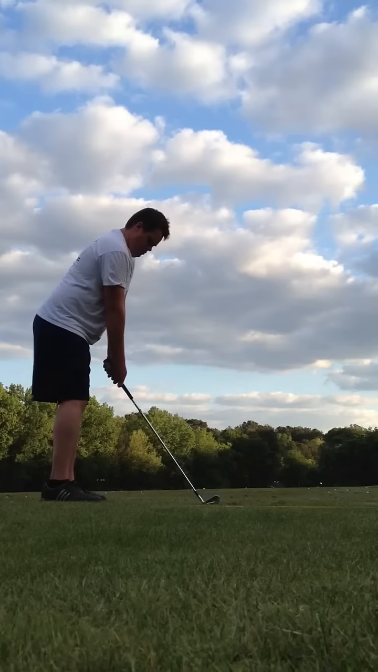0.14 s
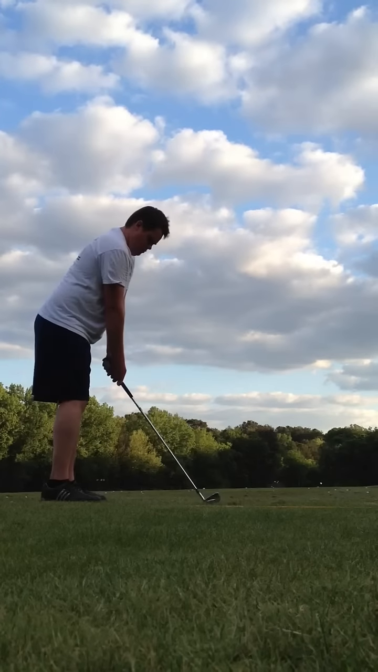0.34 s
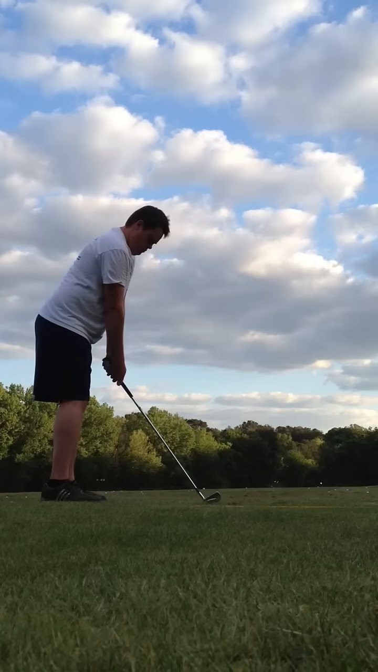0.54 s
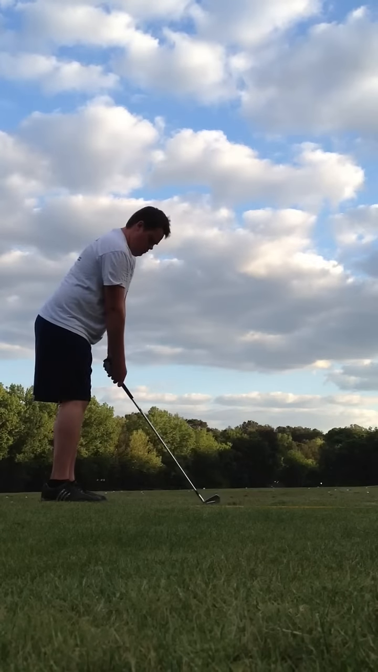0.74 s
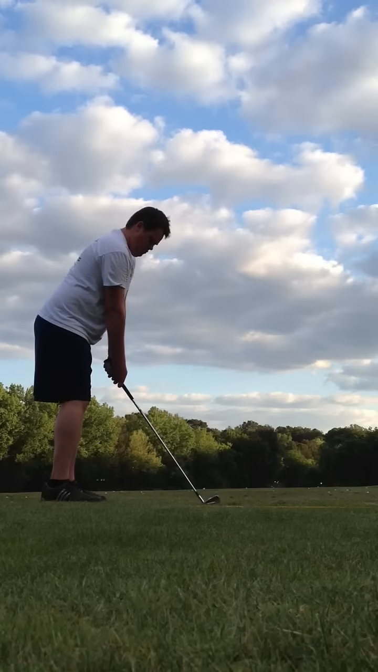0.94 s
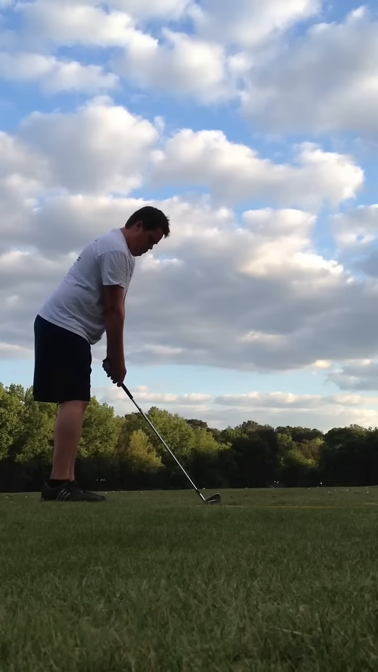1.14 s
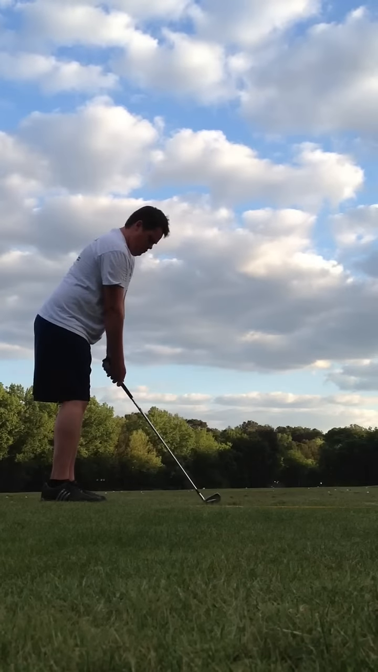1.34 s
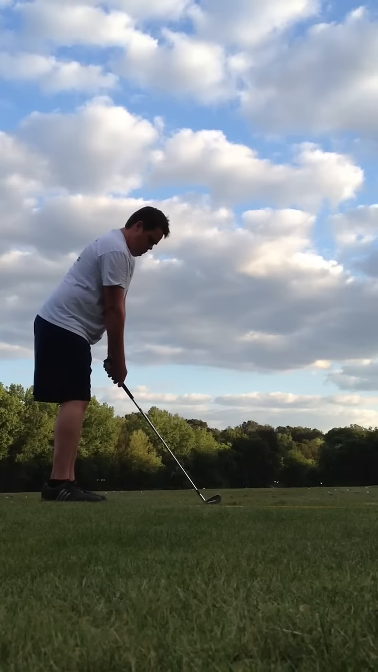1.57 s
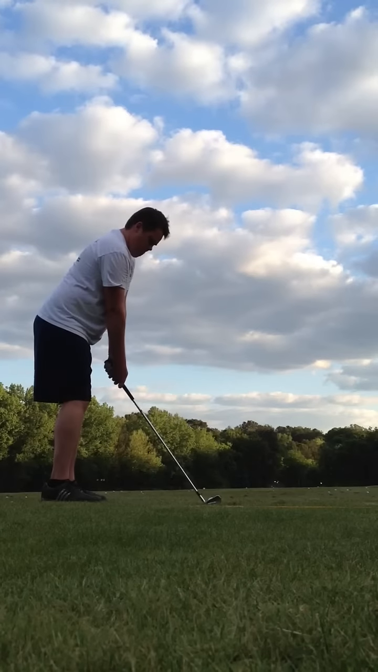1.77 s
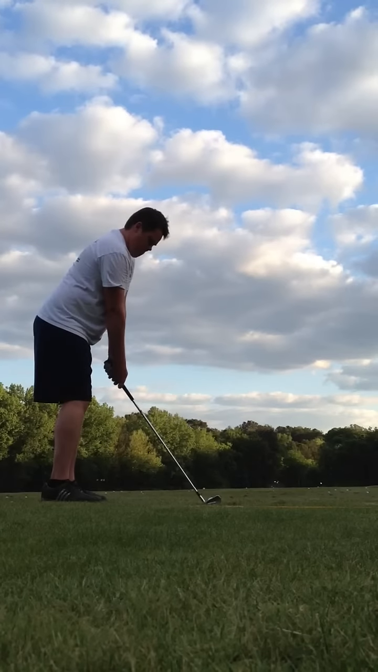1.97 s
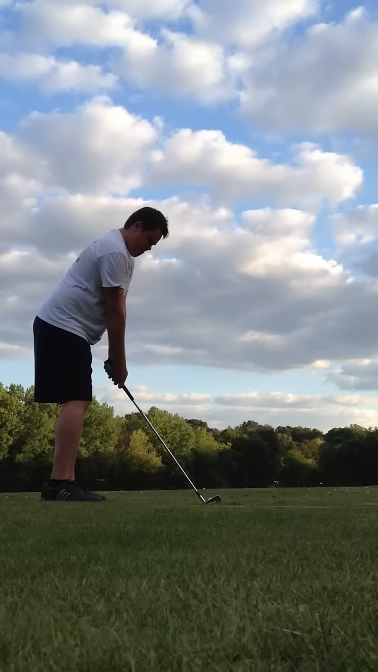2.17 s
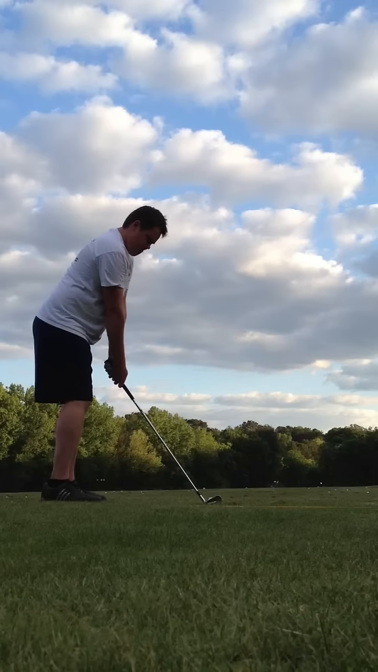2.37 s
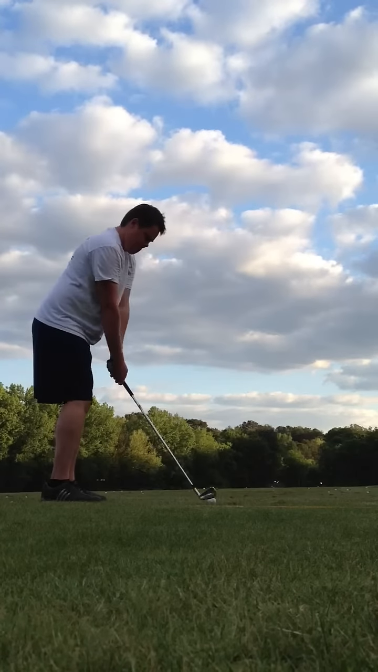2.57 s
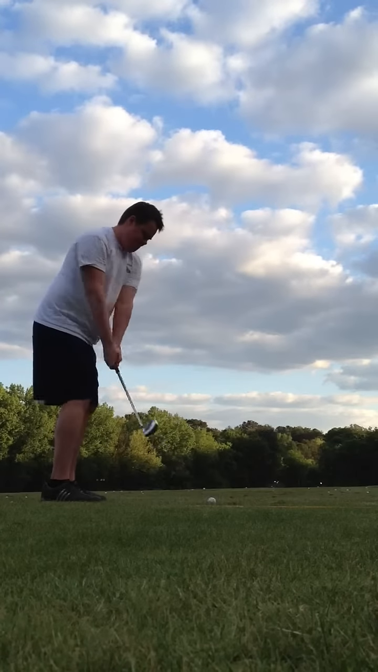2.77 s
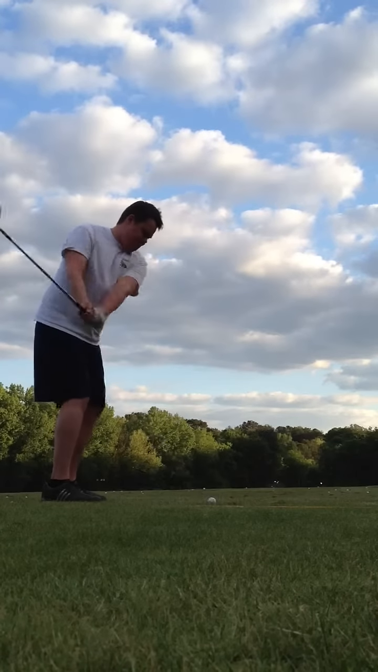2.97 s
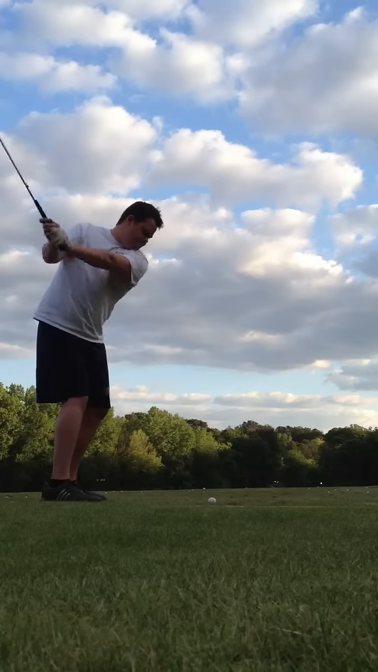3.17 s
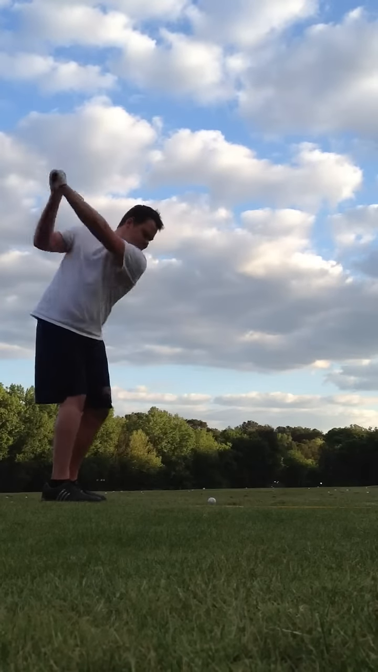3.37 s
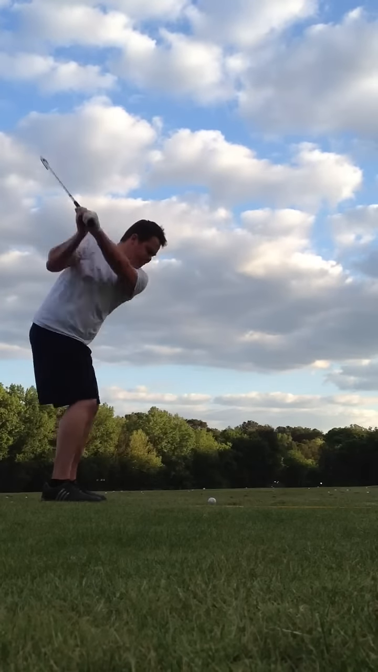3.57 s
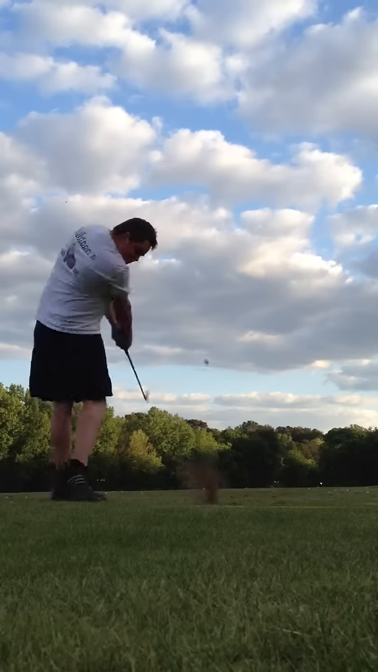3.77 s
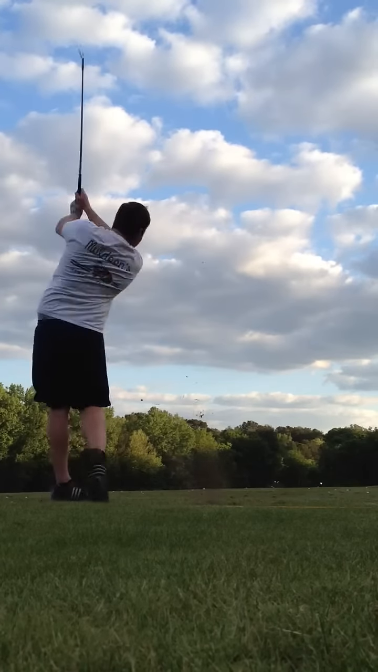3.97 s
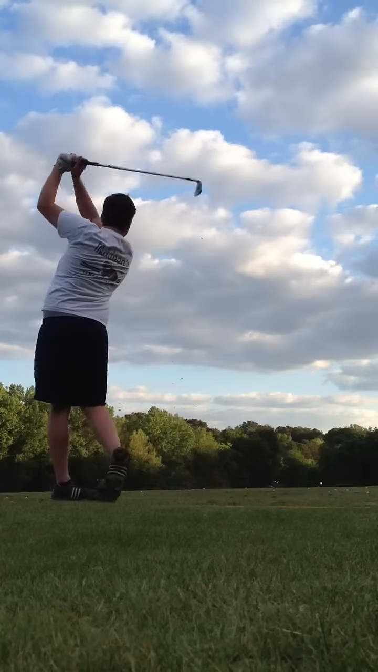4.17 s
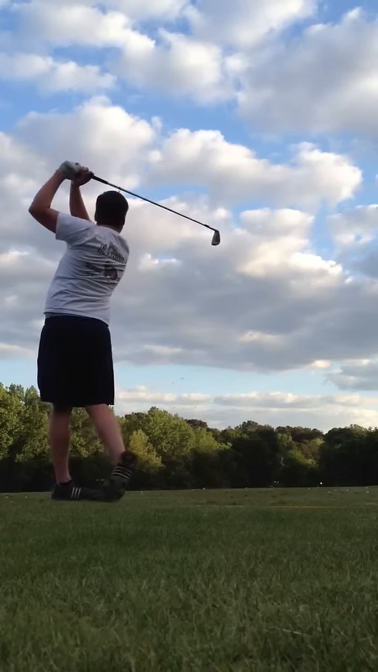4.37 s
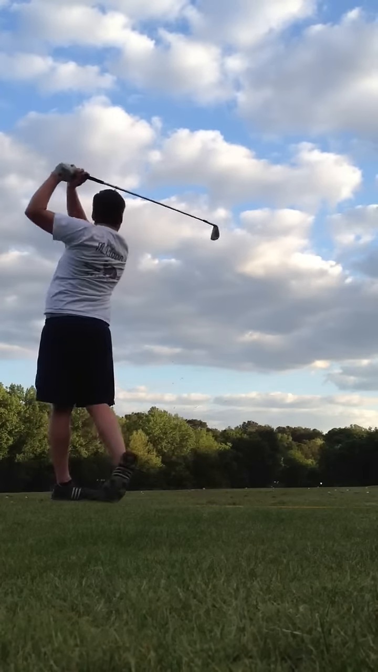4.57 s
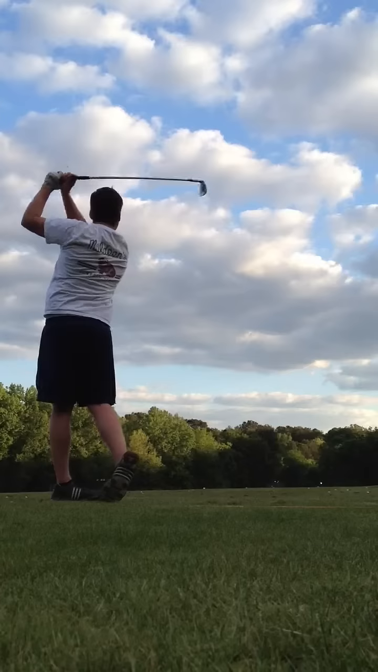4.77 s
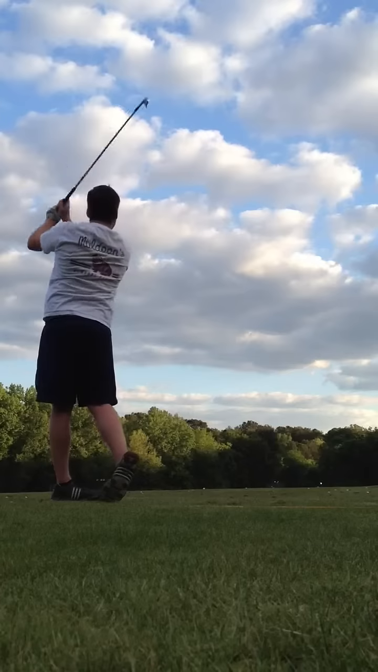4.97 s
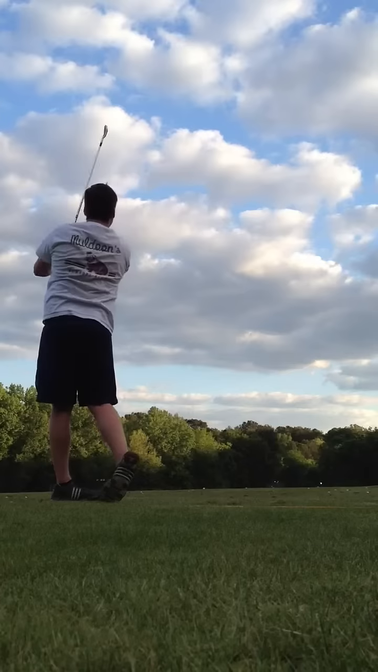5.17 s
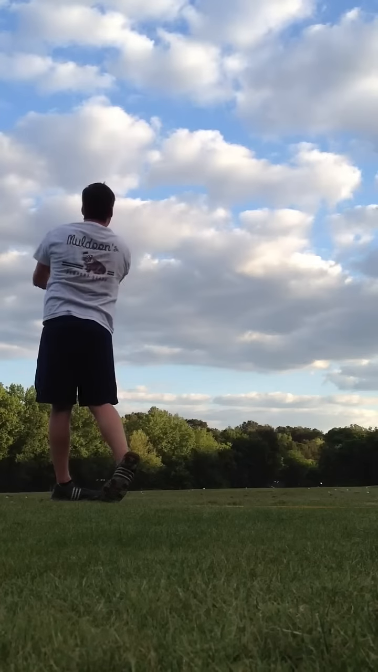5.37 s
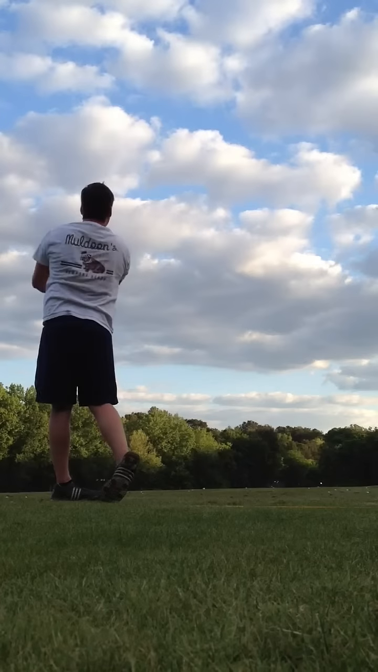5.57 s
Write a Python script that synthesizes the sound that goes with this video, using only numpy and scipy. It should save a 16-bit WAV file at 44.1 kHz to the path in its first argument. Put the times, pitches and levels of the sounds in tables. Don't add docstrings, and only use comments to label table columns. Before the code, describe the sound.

On an open grassy range, thrush-like birds whistle and chip over a low traffic and engine hum. Small grass ticks come close by; a distant golfer's hit cracks faintly before two seconds. Near four seconds an iron swishes and strikes the ball with one loud, dry click and thud, then soil rains lightly on grass. Birds continue. A phone microphone sits low in the grass.

```python
import sys
import numpy as np
from scipy import signal
from scipy.io import wavfile
from scipy.ndimage import uniform_filter1d

SR = 44100
rng = np.random.default_rng(int(sys.argv[2]) if len(sys.argv) > 2 else 0)


def put_to_file(sound):
    columns = np.atleast_2d(sound).T
    safe = np.clip(columns, -1, 1)
    whole_steps = np.round(safe * 32767)
    wavfile.write(sys.argv[1], SR, whole_steps.astype(np.int16))


def boost_factor(decibels):
    exponent = np.asarray(decibels, float) / 20
    return 10 ** exponent


N = 247401


def evened(x):
    return x / np.sqrt(np.mean(x ** 2) + 1e-20)


def add(mix, start_s, sound):
    part = mix[round(start_s * SR):][:len(sound)]
    part += sound[:len(part)]


def unroll(rows):
    s, *columns = np.transpose(rows)
    t = np.arange(s[0], s[-1], 1 / SR)
    return t, [np.interp(t, s, c) for c in columns]


def band(x, low_hz, high_hz):
    edges_hz = np.clip([low_hz, max(high_hz, 1.1 * low_hz)], 30, SR / 2 - 500)
    return signal.sosfilt(signal.butter(2, edges_hz, "bandpass", fs=SR, output="sos"), x)


def resonate(x, hz, width_hz):
    turn = np.exp(2j * np.pi * np.cumsum(hz * np.ones(len(x))) / SR)
    r = np.exp(-np.pi * width_hz / SR)
    return 2 * (turn * signal.lfilter([1 - r], [1, -r], x / turn)).real


def burst(rise_s, t60_s):
    t = np.arange(round((rise_s + t60_s) * SR)) / SR
    return np.minimum(t / rise_s, 1) * boost_factor(-60 * np.maximum(t - rise_s, 0) / t60_s)


# start_s, signed_peak, width_s
BLOWS = [(3.7789, -.15, .00008), (3.77933, .13, .00006), (3.78047, -.21, .0001), (3.7813, -.07, .00008)]
# start_s, pitch_hz, level_db, t60_s, sign
THUD = [
    (3.7769, 700, -29, .012, -1),
    (3.779, 350, -20.5, .022, 1),
    (3.7791, 210, -30, .04, 1),
    (3.78037, 2400, -19, .005, -1),
    (3.7864, 270, -29, .035, -1),
]
# pitch_hz, level_db, t60_s
STRIKE_TONES = [(1105, 3.5, 0.018), (2130, -4, 0.019), (2550, 0.5, 0.016), (3200, -2.5, 0.017),
                (3870, -3.5, 0.014), (4570, -3, 0.01), (4730, -6, .01)]


def strike():
    out, t = np.zeros(N), np.arange(6000) / SR
    for s, peak, width_s in BLOWS:
        add(out, s - .001, peak * np.exp(-.5 * ((t[:100] - .001) / width_s) ** 2))
    for s, hz, db, t60_s, sign in THUD:
        add(out, s, np.sign(sign) * boost_factor(db - 60 * t / t60_s) * np.sin(2 * np.pi * hz * t))
    for hz, db, t60_s in STRIKE_TONES:
        add(out, BLOWS[1][0], boost_factor(-25.5 + db - 60 * t / t60_s) * np.sin(2 * np.pi * hz * t))
    return out


# low_hz, high_hz, level_db, t60_s
CRACK = [
    (3600, 5000, -32.5, 0.024),
    (6000, 8800, -26.5, 0.025),
    (11800, 16400, -38, .014),
]
# start_s, level_db, centre_hz
CLODS = [(3.787, -41, 7200), (3.7898, -49, 6600), (3.799, -47, 4900), (3.8054, -43.5, 4800),
         (3.875, -62, 3900), (3.905, -61, 4500), (3.946, -62, 4600), (3.969, -59, 3900)]
# start_s, level_db, rise_s, t60_s, centre_hz
SHOWERS = [
    (3.79, -60, 0.012, 1.0, 4250),
    (3.812, -63, 0.0088, 0.21, 4600),
    (3.901, -66, 0.065, 0.79, 4530),
]


def spray():
    contact_s, clod_spread, shower_spread = 3.7785, 1.33, 1.75
    crack = [(contact_s, db, .001, t60_s, low_hz, high_hz) for low_hz, high_hz, db, t60_s in CRACK]
    clods = [(s, db, .0015, 0.016, hz / clod_spread, hz * clod_spread) for s, db, hz in CLODS]
    showers = [(*row, hz / shower_spread, hz * shower_spread) for *row, hz in SHOWERS]
    return crack + clods + showers


def rustle(puffs):
    out = np.zeros(N)
    noise, clumps = rng.standard_normal((2, len(puffs), 2 * SR))
    for (s, db, rise_s, t60_s, low_hz, high_hz), n, c in zip(puffs, noise, clumps):
        shape = burst(rise_s, t60_s)[:2 * SR]
        grain = n * boost_factor(2.1 * evened(uniform_filter1d(c, size=130)))
        add(out, s, boost_factor(db) * shape * evened(band(grain, low_hz, high_hz))[:len(shape)])
    return out


# start_s, length_s, hiss_db, tone_db, tone_hz
SWINGS = [
    (3.71, .068, -46, -44, 590),
    (1.68, .09, -80, -53.5, 650),
]


def swings():
    out = np.zeros(N)
    for row in SWINGS:
        add(out, row[0], swish(downswing(*row)))
    return out


def downswing(start_s, length_s, hiss_db, tone_db, tone_hz):
    u = np.linspace(0, 1, 40)
    hiss_at, tone_at = 0.75, 0.58
    away, past = (np.where(u < at, 1 - u / at, (u - at) / (1 - at)) for at in (hiss_at, tone_at))
    hiss = hiss_db - np.where(u < hiss_at, 24, 20) * away ** 2.46
    tone = tone_db - np.where(u < tone_at, 20, 9) * past
    slow_hz, fast_hz = 1900, 6200
    hiss_hz = slow_hz * (fast_hz / slow_hz) ** u ** 1.16
    return np.transpose([start_s + length_s * u, hiss, hiss_hz, tone, tone_hz * (1 - .33 * past)])


def swish(rows):
    t, (hiss_db, hiss_hz, tone_db, tone_hz) = unroll(rows)
    a, b = rng.standard_normal((2, len(t)))
    hiss = evened(resonate(resonate(a, hiss_hz, 3700), hiss_hz, 5100))
    tone = evened(resonate(resonate(b, tone_hz, 220), tone_hz, 230))
    return boost_factor(hiss_db) * hiss + boost_factor(tone_db) * tone


# start_s, peak_db, rise_s, treble_tilt_db_per_octave, thud_db
FAR_HITS = [
    (1.7512, -47, 0.0043, 4, -41.5),
    (1.884, -46, 0.00037, -0.5, -71),
]


def far_hits():
    out = np.zeros(N)
    for s, db, rise_s, tilt_db, thud_db in FAR_HITS:
        shape, n = burst(rise_s, 0.012 + 5.7 * rise_s), rng.standard_normal(8000)
        octaves = [evened(band(n, 1550 * 2 ** k, 3100 * 2 ** k)) for k in range(3)]
        crack = sum(boost_factor(tilt_db * k) * octave for k, octave in enumerate(octaves))
        add(out, s, boost_factor(db) * shape * evened(crack)[:len(shape)])
        add(out, s, boost_factor(thud_db) * shape * np.sin(2 * np.pi * 300 * np.arange(len(shape)) / SR))
    return out


# start_s, level_db, t60_s, low_hz, high_hz
SNAPS = [(1.755, -47, 0.026, 6200, 7550), (1.8652, -56, 0.064, 4200, 7200),
         (1.8833, -44.5, 0.022, 4500, 7500), (2.8135, -51, 0.01, 5500, 12000),
         (4.5407, -58, .031, 2500, 7500), (4.927, -62, 0.14, 6481, 8400)]
# centre_hz, level_db, t60_s
SCUFF_RINGS = [(4500, -64, 0.69), (6430, -56, 0.66), (8020, -65, 0.41), (10700, -63, .3)]


def scuffs():
    scuff_s, rise_s, spread = 1.884, 0.009, 1.094
    snaps = [(s, db, 0.06 * t60_s, t60_s, low_hz, high_hz) for s, db, t60_s, low_hz, high_hz in SNAPS]
    rings = [(scuff_s, db, rise_s, t60_s, hz / spread, hz * spread) for hz, db, t60_s in SCUFF_RINGS]
    return snaps + rings


# start_s, peak_db, centre_hz, bright_edge_db
TICKS = [(0.3017, -56, 4600, -10), (0.921, -55, 3700, -13), (1.041, -61, 2850, -16),
         (1.177, -59, 4300, -10), (1.6434, -56.5, 4060, -12), (1.6794, -63, 4100, -10),
         (1.7824, -62, 3730, -8), (2.146, -61, 4030, -10), (2.1825, -56, 3070, -10),
         (2.2146, -48, 3750, -12), (2.293, -59, 2830, -10), (2.4768, -59, 3600, -10),
         (2.756, -56, 3360, -6), (2.8138, -54.5, 3050, -4), (3.3372, -58.5, 4040, -12),
         (3.555, -60, 4990, -5), (4.9287, -57.5, 4040, -1), (4.9594, -60.5, 4460, -5)]


def ticks():
    out, width_hz = np.zeros(N), 1100
    noise = rng.standard_normal((len(TICKS), 4000))
    for (s, db, hz, edge_db), n in zip(TICKS, noise):
        shape = burst(0.0023, 0.02)[:4000]
        pitch = evened(resonate(resonate(n, hz, width_hz), hz, width_hz))
        snap = pitch + boost_factor(edge_db) * evened(band(n, 2400, 7700))
        add(out, s - .001, boost_factor(db - 1.5) * shape * snap[:len(shape)])
    return out


def mic_port(x):
    x = signal.sosfilt(signal.butter(2, 104, "highpass", fs=SR, output="sos"), x)
    return x - 0.67 * resonate(x, hz=10000, width_hz=2300)


# start_s, length_s, level_db, first_hz, last_hz
ARCHES = [
    (2.533, .114, -64, 2410, 2680),
    (2.711, 0.19, -61, 2220, 2188),
    (3.607, .094, -60, 2490, 2417),
]


def arches():
    u = np.linspace(0, 1, 12)
    bow = 4 * u * (1 - u)
    return [np.transpose([s + length_s * u, first_hz + (last_hz - first_hz) * u + 125.4 * bow,
                          db - 4.5 * (1 - bow)])
            for s, length_s, db, first_hz, last_hz in ARCHES]


# start_s, length_s, level_db, first_hz, last_hz
FALLS = [(0.144, 0.057, -66, 2245, 1766), (.945, .023, -71.5, 3670, 3020), (1.0, 0.042, -73, 3400, 2900),
         (4.445, 0.025, -65.5, 3200, 2760), (4.775, .03, -67, 2220, 2020),
         (4.782, 0.041, -67.5, 3500, 3260), (5.536, 0.075, -67, 3050, 2230)]


def falls():
    u = np.linspace(0, 1, 10)
    return [np.transpose([s + length_s * u, last_hz + (first_hz - last_hz) * (1 - u) ** 1.5, db - 7 * u])
            for s, length_s, db, first_hz, last_hz in FALLS]


def warble(count=3):
    low_hz, high_hz, db = 2750, 3040, -73
    starts_s = 2.861 + .0625 * np.arange(count)
    return [[(s, low_hz, db), (s + 0.029, 1.015 * low_hz, db - 1),
             (s + .04, high_hz, db + 0.5), (s + .055, high_hz, db - 1.5)] for s in starts_s]


def held(table, attack_s, release_s, fade_db):
    onset_db, notes = -9.5, []
    for s, length_s, db, first_hz, last_hz in table:
        opened_s = s + min(attack_s, length_s / 3)
        closing_s = s + length_s - min(release_s, length_s / 3)
        notes.append([(s, first_hz, db + onset_db), (opened_s, first_hz, db),
                      (closing_s, last_hz, db + fade_db),
                      (s + length_s, last_hz, db + fade_db + onset_db)])
    return notes


def whistles(notes, trills=(), flutter_db=0.5):
    out = np.zeros(N)
    for rows in notes:
        t, (hz, db) = unroll(rows)
        edge = np.clip(np.minimum(t - t[0], t[-1] - t) / 0.0014, 0, 1)
        waver = 1 + 0.0045 * evened(uniform_filter1d(rng.standard_normal(len(t)), size=300))
        flutter = flutter_db * evened(uniform_filter1d(rng.standard_normal(len(t)), size=350))
        tone = np.sin(2 * np.pi * np.cumsum(hz * waver) / SR)
        add(out, t[0], np.sqrt(2) * boost_factor(db + flutter) * edge * tone)
    for start_s, end_s, beat_hz, depth in trills:
        t = np.arange(start_s, end_s, 1 / SR)
        beat = 1 - np.clip(depth, 0, 1) * np.cos(np.pi * beat_hz * (t - start_s)) ** 4
        at = round(start_s * SR)
        out[at:at + len(t)] *= 1.21 * beat
    return out


# start_s, length_s, level_db, first_hz, last_hz
NEAR_NOTES = [(0, 0.081, -63.5, 2590, 2810), (.25, .125, -56.5, 2192, 2158),
              (2.432, 0.1, -67.5, 2473, 2400), (2.66, 0.063, -66, 2050, 2140),
              (3.342, 0.047, -72.5, 2390, 2400), (3.49, .12, -68, 2380, 2520),
              (3.788, .062, -57, 2160, 2196), (4.72, 0.058, -74, 2340, 2350), (4.8, .058, -67, 2010, 2060),
              (4.975, .1, -72, 2250, 2350), (5.12, .04, -73, 2310, 2325)]
# start_s, length_s, level_db, first_hz, last_hz
DYING = [(3.847, 0.138, -60, 2255, 2290), (3.9, 0.12, -63.5, 3280, 3120), (4.335, .13, -68, 3110, 3070)]
# start_s, end_s, beat_hz, depth_0_to_1
TRILLS = [(0, .085, 96, 0.66), (2.538, 2.65, 62, 1), (2.767, 2.93, 62, 0.83), (3.607, 3.7, 72, .9),
          (3.847, 3.99, 45.6, 1)]
# start_s, length_s,
# level_db, first_hz, last_hz
FLUTTERING_NOTES = [(.08, 0.067, -60, 3157, 3215), (.452, .028, -74, 3300, 3400), (1.52, .048, -75, 2780, 2790),
                    (1.7, 0.07, -75, 3180, 3020), (2.442, .072, -70.5, 4890, 4870), (3.28, .03, -76, 2670, 2640),
                    (3.425, .045, -83, 3495, 3510), (3.497, 0.087, -66.5, 4760, 5030),
                    (3.63, .035, -71, 3430, 3520), (4.02, .07, -74, 3120, 3220), (4.1, .065, -74.5, 2590, 2510),
                    (4.54, .044, -60.5, 3130, 3155), (4.89, 0.095, -67.5, 2740, 2684),
                    (5.03, 0.073, -72, 2680, 2840), (5.21, 0.03, -73, 3170, 3080), (5.45, 0.065, -77, 5490, 5470),
                    (5.49, .045, -68, 3350, 3530)]


def song():
    near = arches() + held(NEAR_NOTES, 0.014, .006, fade_db=-1.5) + held(DYING, 0.0054, .015, fade_db=-10)
    far = held(FLUTTERING_NOTES, 0.0097, 0.011, fade_db=-1.5) + falls() + warble()
    return whistles(near, TRILLS) + whistles(far, flutter_db=3.5)


# start_s, peak_db, start_hz, end_hz
CHIPS = [(0.317, -58.5, 7030, 3720), (1.25, -59, 7230, 3750), (2.456, -70, 8200, 6900),
         (2.7143, -59.5, 6330, 3380), (4.577, -59, 7100, 3870), (5.334, -70.5, 6500, 3750)]
BEAK_HZ = (4500, 5550, 6500)


def chips():
    out = np.zeros(N)
    for s, db, start_hz, end_hz in CHIPS:
        u = np.linspace(0, 1, round(.013 * SR))
        hz = start_hz * (end_hz / start_hz) ** (u ** .7 + 0.015 * np.sin(4 * np.pi * u))
        add(out, s, boost_factor(db) * np.sin(np.pi * u) * np.sin(2 * np.pi * np.cumsum(hz) / SR))
    out *= 1 + 0.74 * evened(uniform_filter1d(rng.standard_normal(N), size=20))
    return 0.5 * out + 0.5 * sum(resonate(out, hz, 690) for hz in BEAK_HZ)


# low_hz, high_hz
CHORUS_HZ = (2300, 3700)


def chorus(count=70):
    notes, (low_hz, high_hz) = [], CHORUS_HZ
    for when, pitch, glide, length, size in rng.random((count, 5)):
        s = when * (N / SR - .2)
        hz = low_hz * (high_hz / low_hz) ** pitch
        db = -86 + 6 * (size - .5)
        notes.append([(s, hz, db), (s + .015 + .04 * length, hz * (.75 + .4 * glide), db - 3)])
    return whistles(notes, flutter_db=10.0)


def wood(x):
    t = np.arange(SR) / SR
    sizes = rng.standard_normal(len(t)) * boost_factor(1.25 * rng.exponential(1, len(t)))
    fade = boost_factor(-60 * t / 0.47) + boost_factor(-21 - 60 * t / 1.2)
    hits = rng.random(len(t)) < 1800 / SR
    taps = sizes * hits * fade * (t > .003)
    return signal.fftconvolve(x, taps / np.linalg.norm(taps))[:N]


# time_s, rumble_db
TRAFFIC = [(0.0, -56.5), (0.94, -57.5), (1.55, -56.5), (1.86, -53), (2.47, -56.5), (2.91, -58),
           (3.97, -55.5), (4.66, -56), (4.98, -53), (5.61, -54.5)]


def rumble_db(s):
    return np.interp(s, *np.transpose(TRAFFIC))


def engine(first_hz, idle_hz, settle_s, over_rumble_db, grow_db_per_s, rev=0):
    s = np.linspace(0, N / SR, 120)
    bump = rev * np.exp(-.5 * ((s - 2.33) / 0.1307) ** 2)
    hz = idle_hz + (first_hz - idle_hz) * np.exp(-s / settle_s) + 22.03 * bump
    db = rumble_db(s) + over_rumble_db + grow_db_per_s * s + 8.5 * bump
    return np.transpose([s, hz, db])


def drone(rows, width_hz, blur):
    t, (hz, db) = unroll(rows)
    fuzz = evened(resonate(rng.standard_normal(len(t)), hz, width_hz))
    note = np.sqrt(2) * np.sin(2 * np.pi * np.cumsum(hz) / SR)
    return np.pad(boost_factor(db) * evened(note + blur * fuzz), (0, N))[:N]


# pitch_hz, level_db_per_hz
AIR = [(25, -64), (69, -45), (125, -14), (187, -1), (252, -8.5), (347, -14), (627, -20.5), (1300, -29),
       (2340, -35.5), (4220, -36), (7000, -41), (9900, -49), (12500, -42), (15300, -42)]


def air():
    frames, hz = N // 256 + 5, np.fft.rfftfreq(1024, 1 / SR)
    a, b, patches_db = rng.standard_normal((frames, 513, 3)).T
    patches_db = evened(uniform_filter1d(uniform_filter1d(patches_db, 12, 0), 14, 1))
    air_hz, air_db = np.transpose(AIR)
    swell_db = rumble_db(np.arange(frames) * 256 / SR) + 56
    field_db = np.interp(np.log(hz + 1), np.log(air_hz), air_db)[:, None] + patches_db
    field_db = field_db + swell_db / (1 + (hz[:, None] / 600) ** 2)
    calm = signal.istft((a + 1j * b) * boost_factor(field_db - swell_db), nperseg=1024, noverlap=768)[1]
    wash = signal.istft((a + 1j * b) * boost_factor(field_db), nperseg=1024, noverlap=768)[1][:N]
    return boost_factor(-55.5) * wash / np.sqrt(np.mean(calm ** 2))


def scene():
    near = strike() + rustle(spray()) + swings() + far_hits() + rustle(scuffs()) + ticks()
    whistled, chip = song(), chips()
    birds = whistled + 0.7 * chip + wood(boost_factor(-12) * whistled + boost_factor(8.5) * chip + chorus())
    first = engine(first_hz=205, idle_hz=175, settle_s=1.41, over_rumble_db=-5.5, grow_db_per_s=0.96)
    second = engine(first_hz=261, idle_hz=211, settle_s=1.2, over_rumble_db=-5, grow_db_per_s=0.16, rev=0.98)
    ground = air() + drone(first, width_hz=13.0, blur=0.42) + drone(second, width_hz=12.0, blur=3.0)
    return (ground + birds + mic_port(near))[None]


def roll_off(x):
    return signal.sosfilt(signal.butter(12, 15470, fs=SR, output="sos"), x)


def record(dry):
    edge = signal.firwin(301, 15350, window=("kaiser", 8), fs=SR)
    mix = signal.oaconvolve(dry, edge[None], "same")
    return roll_off(mix)


dry = scene()
out = record(dry)
put_to_file(out)
```